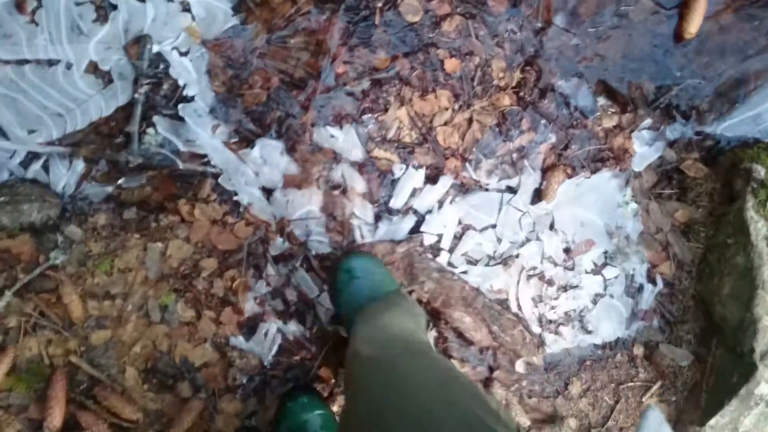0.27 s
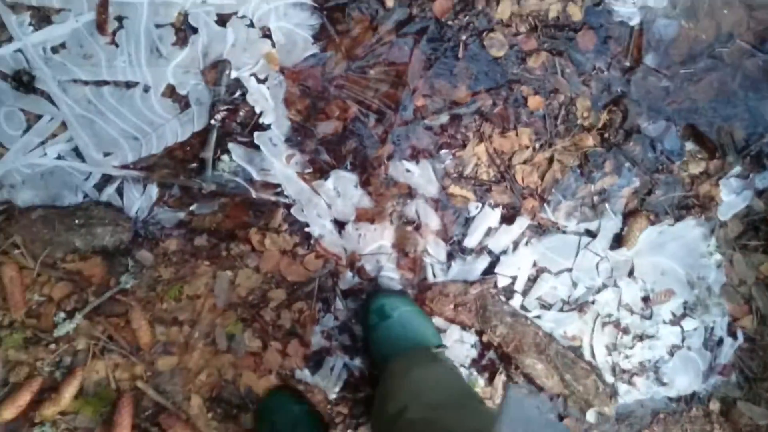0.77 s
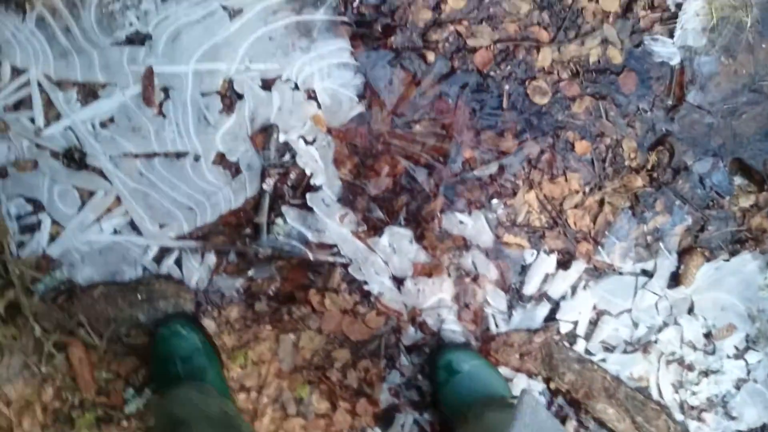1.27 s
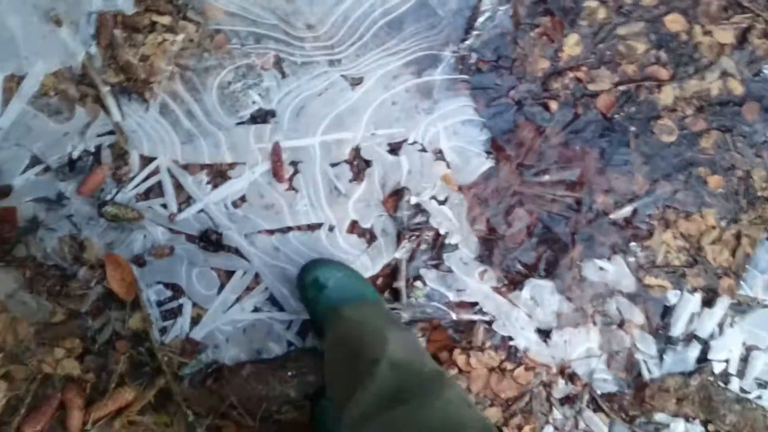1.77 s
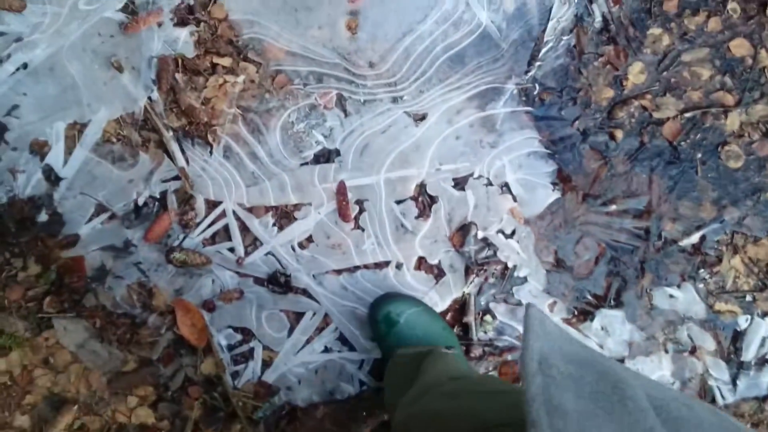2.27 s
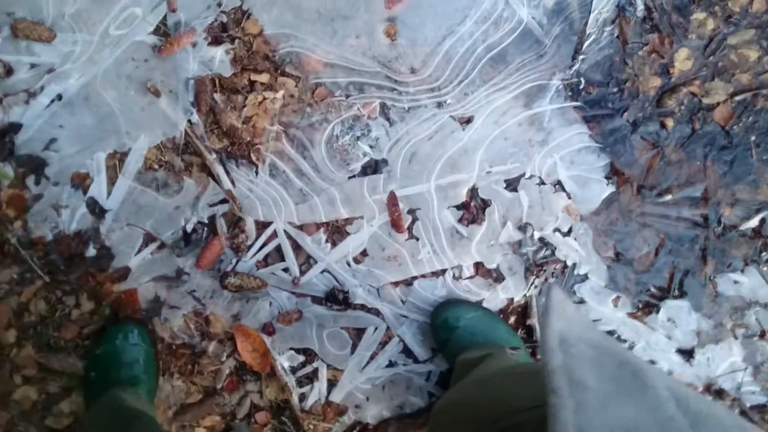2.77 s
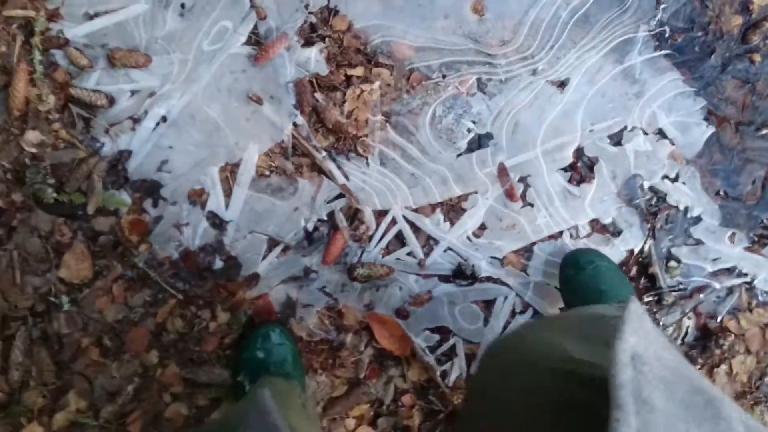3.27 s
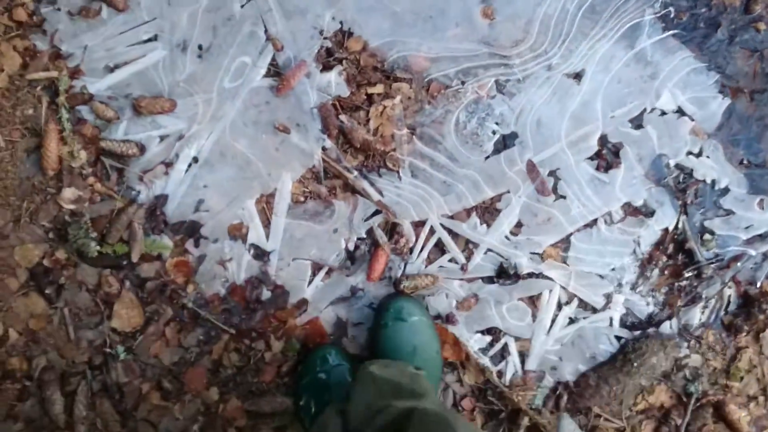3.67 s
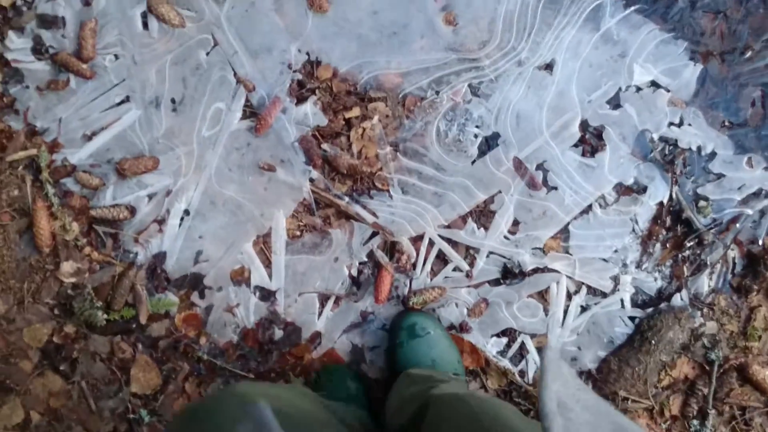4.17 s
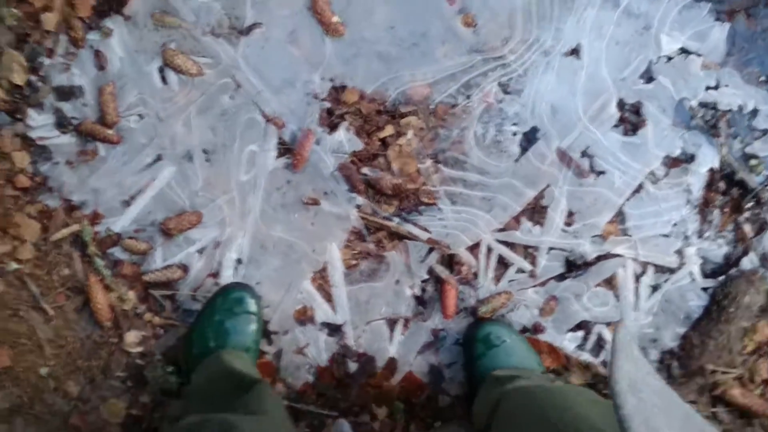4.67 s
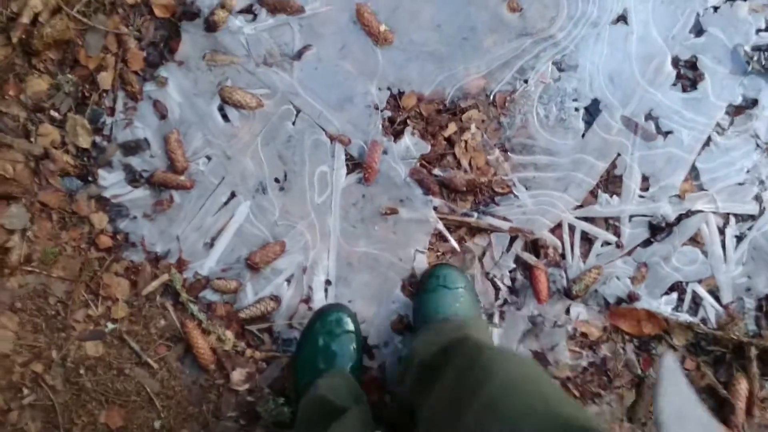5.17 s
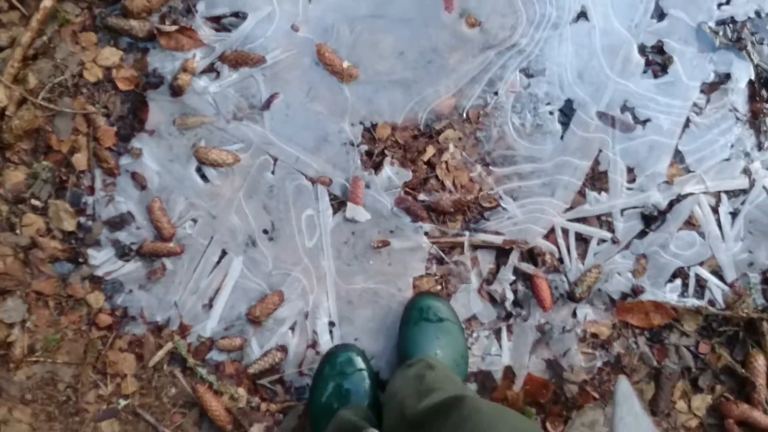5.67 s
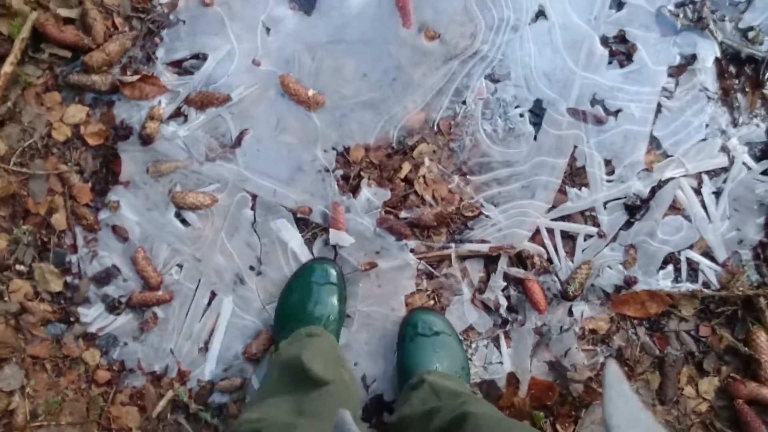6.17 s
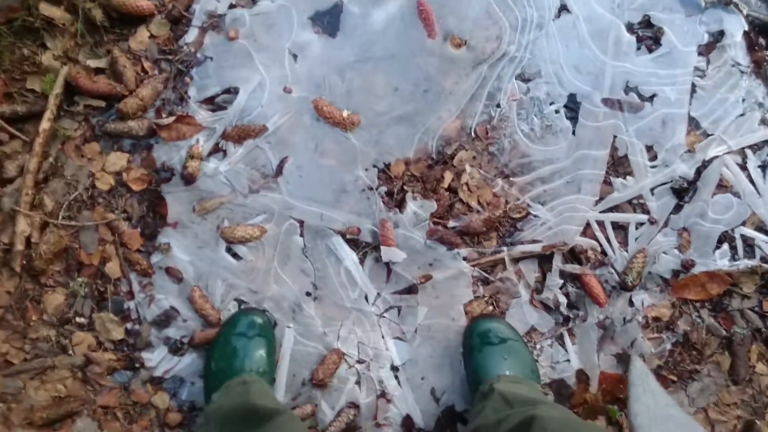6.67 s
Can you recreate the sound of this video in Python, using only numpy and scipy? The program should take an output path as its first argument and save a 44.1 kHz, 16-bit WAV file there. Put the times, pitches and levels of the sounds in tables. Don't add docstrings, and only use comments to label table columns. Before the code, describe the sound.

Rubber boots step on thin ice over a leafy forest puddle, cracking it sharply in irregular bursts with soft thuds and glassy tinkles.

```python
import sys
import numpy as np
from scipy import signal
from scipy.fft import rfft, irfft, next_fast_len
from scipy.io import wavfile
from scipy.ndimage import uniform_filter1d, minimum_filter1d, map_coordinates

SR = 44100
rng = np.random.default_rng(int(sys.argv[2]) if len(sys.argv) > 2 else 0)


def nominal_scale(level):
    x = np.asarray(level, float) / 20
    return 10 ** x


def wav_record(signal):
    frames = np.transpose(np.atleast_2d(signal))
    bounded = np.clip(frames, -1, 1)
    quanta = np.round(bounded * 32767).astype(np.int16)
    wavfile.write(sys.argv[1], SR, quanta)


N = 306054


def read(points, hz):
    f, value = np.transpose(points)
    return np.interp(np.log(hz + 1), np.log(f + 1), value)


def add(mix, s, sound):
    part = mix[:, max(round(s * SR), 0):][:, :sound.shape[1]]
    part += sound[:, :part.shape[1]]


# f/Hz, level/dB
LEAN = [(2000, -0.5), (4400, 1), (8000, -0.5), (15000, 3)]
# f/Hz, likeness/1
OPPOSED = [(100, 0.88), (500, 1), (1500, 0.87), (4000, 0.16), (12000, 0.63)]


def ports(a, b, hz, likeness, lag_s):
    same = np.clip(read(likeness, hz), 0, 1)
    lean = nominal_scale(read(LEAN, hz) / 2)
    felt = 1 / (1 + (900 / (hz + 1)) ** 4)
    shifted = a * np.exp(-2j * np.pi * hz * lag_s * felt)
    right = -same * shifted + np.sqrt(1 - same ** 2) * b
    return np.array([a * lean, right / lean])


# f/Hz, level/(dB per Hz)
AIR = [(15, -36.5), (25, -13), (85, 1), (238, -6), (320, -5.5), (432, -5), (806, -9), (1870, -8),
       (4460, -15), (6340, -14.5), (15100, -24), (16400, -37)]
# f/Hz, likeness/1
AIR_OPPOSED = [(60, 0.3), (400, 0.69), (1500, .2), (4000, .02)]


def air():
    level_db = -65.5
    hz = np.fft.rfftfreq(N, 1 / SR)
    noise = rfft(rng.standard_normal((2, N)))
    pair = irfft(ports(*noise, hz, AIR_OPPOSED, 0) * nominal_scale(read(AIR, hz)), N)
    return nominal_scale(level_db) * pair / pair.std()


# t/s, right port lag/ms
STANCE = [(0, 0.17), (.42, 0.28), (.52, 0.19), (2.05, 0.096), (2.15, 0.045), (2.4, 0.058), (2.85, 0.015),
          (3.36, 0.086), (3.65, 0.13), (3.76, 0.017), (4.4, 0.11), (5.1, 0.12), (5.42, 0.026), (5.6, 0.055),
          (6.4, 0.039), (6.85, 0.083)]


def stance_lag_s(t):
    return np.interp(t, *np.transpose(STANCE)) / 1000


# f/Hz, level/(dB per Hz)
ICE = [(120, -46.5), (280, -24), (550, -5), (1000, -3.5), (1700, 1), (2300, -4.5), (3500, -11), (4300, -16),
       (4800, -15), (5300, -9.5), (6400, -6), (7600, -11), (13500, -14.5), (14900, -6), (16200, -17.5)]
SPLIT_HZ = [4200, 9000]


def ice_bands(size):
    hz = np.fft.rfftfreq(size, 1 / SR)
    above = [1 / (1 + (f / (hz + 1)) ** 14) for f in SPLIT_HZ]
    shares = np.array([above[0] - above[1], 1 - above[0], above[1]])
    log_gain = np.log(nominal_scale(read(ICE, hz)) * np.sqrt(abs(shares)) + 1e-5)
    circle = np.concatenate([log_gain, log_gain[:, -2:0:-1]], axis=1)
    minimum_phase = np.exp(np.conj(signal.hilbert(circle, axis=1)))
    return hz, minimum_phase[:, :len(hz)]


def fractures(size, per_s, spread_db):
    strength = nominal_scale(spread_db * np.minimum(rng.exponential(1, size), 4))
    strength *= rng.random(size) < per_s / SR
    return strength * rng.standard_normal((2, size))


# peak t/s, level/dB, loading/s, easing/s, wetness/dB
PRESSES = [(.106, -53, 0.19, 0.43, -0.5), (.265, -54, 0.02, 0.39, 23), (0.356, -25.5, 0.047, 0.077, 1),
           (.607, -49.5, 0.37, 0.47, 5), (1.334, -63.5, .06, 0.18, -8.5), (1.51, -50, 0.013, 0.37, -6.5),
           (4.8, -62.5, .1, 0.12, -2.5), (1.581, -47.5, 0.092, 0.62, -11), (1.836, -50, 0.42, 0.1, -12.5),
           (2.048, -40, .012, 0.16, 14), (2.1, -36.5, 0.13, 0.46, -5.5), (2.442, -44, 0.13, 0.15, 1.5),
           (2.641, -29, 0.021, 0.17, 1), (2.8, -49.5, 1, 1, -0.5), (3.178, -51.5, 0.078, 0.052, 2.5),
           (3.389, -39.5, 0.13, 0.29, -4.5), (3.62, -69, 0.12, 0.6, 16.5), (3.784, -38.5, 0.11, 0.21, 2.5),
           (4.29, -49.5, 0.082, 0.83, -5.5), (5.169, -52.5, 0.2, 0.22, -1),
           (5.417, -30.5, 0.0091, 0.35, -6), (5.883, -41, 0.023, 0.094, 12), (6.039, -51, 0.33, 0.28, -5),
           (6.136, -34, 0.027, 0.046, 12), (6.303, -36.5, 0.014, 1, -1.5),
           (6.862, -39.5, 0.0084, 0.097, 13)]
LIFTS = [
    4.47,
    6.55,
]


def pressure_db(t):
    idle_db, swing_db, lift_db_per_s = -88.5, 30, 160
    dry_fizz_db, wet_dulls, fizz_drop = 4, 0.33, 2.2
    power = nominal_scale(2 * idle_db) * np.ones((3, len(t)))
    for s, db, loading_s, easing_s, wet_db in PRESSES:
        drop_db = swing_db * np.where(t < s, (s - t) / abs(loading_s), (t - s) / abs(easing_s))
        drop_db = drop_db + lift_db_per_s * sum(np.maximum(t - lift, 0) for lift in LIFTS if lift > s)
        fizz_db = dry_fizz_db - wet_dulls * wet_db - fizz_drop * drop_db
        power = power + nominal_scale(2 * (db + np.array([-drop_db, wet_db - drop_db, fizz_db])))
    return 10 * np.log10(power)


def crunch():
    size = next_fast_len(N // 2 + 2048, real=True) * 2
    hz, t, out = np.fft.rfftfreq(size, 1 / SR), np.arange(N) / SR, 0
    bands = rfft(irfft(ice_bands(size=4096)[1]), size)
    clumps = uniform_filter1d(rng.standard_normal(size), size=130)
    clumps /= clumps.std()
    for band, level_db, clump_db in zip(bands, pressure_db(t), [4.0, 2.2, 4.5]):
        swarm = fractures(size, per_s=4500, spread_db=3.5) * nominal_scale(clump_db * clumps)
        pair = irfft(ports(*rfft(swarm), hz, OPPOSED, 0) * band, size)[:, :N]
        loudness = np.sqrt(uniform_filter1d(pair.mean(0) ** 2, size=30000))
        out = out + pair / loudness * nominal_scale(level_db)
    trailing = (t - stance_lag_s(t)) * SR
    return np.array([out[0], map_coordinates(out[1], [trailing], order=3)])


def patchy(x, depth_db):
    z = signal.stft(x, nperseg=512)[2]
    patches = uniform_filter1d(rng.standard_normal(z.shape[1:]), size=2, axis=0)
    patches = uniform_filter1d(patches, size=5, axis=1)
    gain_db = depth_db * patches / patches.std() - 0.52 * depth_db ** 2
    return signal.istft(z * nominal_scale(gain_db), nperseg=512)[1][:, :N]


# t/s, sheet f/Hz, splinter f/Hz, bite level/dB, belly level/dB
PIECES = [(0.163, 1550, 7470, 3.5, 12.5), (0.2566, 1470, 6260, 12.5, 8), (0.267, 1990, 6600, 17.5, 1.5),
          (0.2741, 1890, 5370, 13, -6), (0.2966, 2240, 6150, 7.5, -7), (0.3107, 1194, 6300, 3.5, -15.5),
          (0.3248, 1780, 7300, 5, -7.5), (0.342, 1460, 6300, 3, -2.5), (0.3594, 1787, 6640, 1, -9),
          (0.613, 1330, 6000, 2, 18), (2.042, 1437, 6330, -2, -3.5), (2.09, 1697, 5300, -3, 1.5),
          (2.1, 1550, 5300, -16, 4), (2.145, 1345, 5700, -5, -1.5), (2.4227, 1032, 8490, -4, 15),
          (2.6024, 950, 5680, -5, 6.5), (2.6351, 1603, 5500, 5.5, 11.5), (2.65, 1170, 5660, -4, 2),
          (2.7732, 2400, 5340, -14, 1), (3.3653, 1640, 5800, -0.5, -3), (3.3982, 1420, 5440, -0.5, 3.5),
          (3.7606, 2050, 5800, -3.5, 6.5), (3.8057, 2000, 6050, -7, -3), (4.408, 2156, 4670, 3.5, -22),
          (5.155, 1640, 6140, -5.5, -22.5), (5.4126, 1394, 5140, 1.5, 2.5), (5.4302, 1570, 5530, 4, 8.5),
          (5.8755, 1600, 6600, 0.5, -17), (6.1211, 1533, 4530, -4.5, -2), (6.2956, 1200, 6660, 1, 0.5),
          (6.3472, 1380, 6100, -8, 1), (6.4032, 1482, 6040, -5, 2.5), (6.8594, 1410, 6520, -2.5, 5.5)]


def freed_pieces(s, hz):
    bite_hz, belly_hz = 3250, 950
    piece_hz = 1050 * 11 ** rng.random((9, 1))
    near_s, sheet_hz, splinter_hz, bite_db, belly_db = min(PIECES, key=lambda row: abs(row[0] - s))
    large = abs(near_s - s) < .005
    if large:
        piece_hz = np.concatenate([[[sheet_hz], [sheet_hz], [splinter_hz]], piece_hz[2:]])
    bite = np.exp(-(np.log((hz + 1) / bite_hz) / .25) ** 2)
    belly = 1 / (1 + (hz / belly_hz) ** 8)
    pole = np.pi * piece_hz / 19
    rings = (pole / (pole + 2j * np.pi * (hz - piece_hz))).sum(0)
    return (0.79 + rings * 1.1) * nominal_scale(large * (bite_db * bite + belly_db * belly))


def cracks(rows, fizz_db, size):
    lead = 300
    hz, bands = ice_bands(size)
    t, out = (np.arange(size) - lead) / SR, np.zeros((2, N))
    for s, db, sheet_db, t60 in rows:
        db = min(db, -3)
        swarm = fractures(size, per_s=20000, spread_db=1.5)
        pieces = freed_pieces(s, hz)
        lag_s = stance_lag_s(s) + .02e-3 * rng.standard_normal()
        build_up = np.exp(np.minimum(t, 0) / (0.0003 + 0.007 * t60))
        snap = 1 + 1.9 * np.exp(-abs(t) / 0.0016 - t60 / 0.17)
        sound = 0
        for band, level_db, stretch in zip(bands, [db, db + sheet_db, db + fizz_db], [1.1, 1.5, .85]):
            decay = nominal_scale(-60 * np.maximum(t, 0) / abs(t60 * stretch))
            shape = build_up * snap * decay * (t < .07)
            spectra = ports(*rfft(swarm * shape), hz, OPPOSED, lag_s)
            pair = irfft(spectra * band * pieces, size)
            peak = uniform_filter1d(pair.mean(0) ** 2, size=100).max() ** .5
            sound = sound + nominal_scale(level_db) * pair / peak
        add(out, s - .0013 - lead / SR, sound)
    return out


# peak t/s, splinter level/dB, sheet level re splinter/dB, t60/s
SLABS = [(.1497, -57, 3.5, 0.021), (0.2566, -7.5, -8.5, 0.02), (0.2966, -37, 17, 0.041),
         (0.3248, -13, -2, 0.016), (0.342, -28, 11, 0.03), (.538, -37, -0.5, 0.053),
         (0.613, -42.5, -0.5, 0.07), (.7024, -34.5, -23, 0.032), (.941, -59.5, -9, 0.2),
         (1.616, -37, -24.5, 0.012), (1.679, -49, -9, 0.069), (1.7004, -35, -28, 0.0029),
         (1.8293, -37.5, -24, 0.038), (2.0395, -21, -12, 0.071), (2.1, -19.5, 4.5, 0.012),
         (2.7303, -37.5, -28, 0.07), (2.862, -38.5, -25, 0.024), (2.89, -49, -20, 0.019),
         (2.9016, -39.5, -26, 0.019), (3.1399, -39.5, -36.5, 0.0044), (3.6925, -45.5, -13, 0.014),
         (3.735, -44.5, 6, 0.56), (3.8057, -20, -7.5, 0.019), (5.067, -38.5, -20, 0.0095),
         (6.4032, -27.5, -2, 0.062), (6.8594, -17, -1.5, 0.064), (6.8756, -22, -6.5, 0.032)]
PLATES = [(0.025, -53.5, -26.5, 0.0078), (.267, -11, -6.5, 0.076), (0.2736, 0.5, -3, 0.028),
          (0.3101, -29.5, 11.5, 0.16), (.435, -65, 30, 0.051), (1.256, -64.5, 4, 0.032),
          (1.781, -47, -6, 0.086), (1.84, -38, -13.5, 0.12), (1.914, -47, -8, 0.15),
          (2.144, -26.5, -3, 0.066), (2.278, -35, -6, 0.069), (2.604, -31.5, -4, 0.04),
          (2.7834, -49, 17, 0.07), (3.113, -45, -21, 0.025), (3.3986, -31, -8.5, 0.058),
          (3.4365, -34, -35, 0.08), (3.4644, -39, -13, 0.069), (3.4957, -37, -16.5, 0.089),
          (3.524, -37, -28, 0.032), (3.5852, -46, -19, .022), (4.407, -25, -17.5, 0.033),
          (4.5908, -48.5, -13, .011), (5.349, -49.5, -22, 0.019), (5.413, -20.5, -2.5, 0.099),
          (5.8757, -21, -2, 0.036), (6.3474, -19.5, -10, 0.081), (6.3546, -14, -14, 0.0055),
          (6.5392, -47.5, -1, 0.32)]
PANES = [(0.105, -52, 13.5, 0.029), (0.3592, -3, -2.5, 0.012), (1.596, -38.5, -18, 0.026),
         (1.7974, -44, -10, 0.061), (1.947, -42, -16, 0.095), (2.073, -33, -19, 0.084),
         (2.092, -17.5, -2, 0.04), (2.2552, -43.5, -14, 0.22), (2.773, -30.5, 2.5, 0.079),
         (2.8375, -34, 0.5, 0.059), (2.9638, -51.5, -4, 0.23), (3.3649, -25.5, 2.5, 0.035),
         (3.541, -32, -19, 0.065), (3.7835, -27, -29, 0.061), (3.821, -38, -4.5, 0.038),
         (5.154, -41, 1, 0.061), (5.2262, -45, 0, 0.034), (5.5924, -43.5, 7.5, 0.049),
         (5.614, -42.5, -28, 0.25), (5.667, -42.5, -20, 0.074), (5.8648, -41, 3.5, 0.088),
         (6.1353, -26, 2, 0.045), (6.365, -22, -4.5, 0.02)]
NEEDLES = [(0.3764, -33.5, 4, 0.031), (0.5836, -37, -29, 0.034), (0.623, -40, -13, 0.041),
           (1.507, -48, -17, 0.081), (2.0435, -8, 1.5, 0.02), (2.0917, -19, 2, 0.079),
           (2.3238, -44.5, -12, 0.1), (2.586, -48, -3, 0.089), (2.6356, -10, -3.5, 0.057),
           (2.762, -41, -6, 0.047), (3.348, -42, -35, 0.15), (3.415, -33.5, -28, 0.024),
           (3.761, -27, -1, 0.055), (4.24, -51.5, -6.5, 0.073), (4.361, -54.5, -6, 0.41),
           (4.431, -45, 0.5, 0.1), (5.113, -37.5, -25, 0.027), (5.4305, -23.5, -8, 0.03),
           (5.4773, -27, -12, 0.028), (5.5132, -32, -18, 0.092), (5.6273, -40, -7, 0.051),
           (5.9958, -36.5, -7, 0.041), (6.0475, -47.5, 16.5, 0.1), (6.076, -31.5, -11, 0.053),
           (6.2962, 0.5, -3.5, 0.025), (6.484, -34.5, -0.5, 0.029), (6.9265, -38, -2.5, 0.036)]
SKIN = [(0.1, -44.5, -7, 0.021), (0.163, -51.5, 12, 0.013), (1.312, -61, 10.5, 0.021),
        (1.5222, -58, -5.5, 0.029), (2.174, -43, 0, 0.032), (2.187, -37.5, -23, 0.044),
        (2.297, -39.5, -26, 0.033), (2.423, -30, -12.5, 0.048), (2.449, -40, 4, 0.01),
        (2.652, -24.5, 3.5, 0.1), (3.1613, -43.5, -41, 0.034), (4.275, -45, -5, 0.016),
        (5.4687, -31, -10.5, 0.056), (5.699, -46.5, -5.5, 0.039), (5.9777, -42.5, -14, 0.029),
        (6.11, -39.5, -6.5, 0.046), (6.121, -25.5, 4.5, 0.073), (6.396, -33, -14, 0.057),
        (6.4105, -28.5, -6.5, 0.036), (6.4716, -30, -10.5, 0.034), (6.8644, -29.5, -20.5, 0.12)]
FIZZ_DB = [-15.5, -8.5, -5, 0.5, 5]


def breaking_ice():
    kinds = zip([SLABS, PLATES, PANES, NEEDLES, SKIN], FIZZ_DB)
    return sum(cracks(rows, fizz_db, size=3456) for rows, fizz_db in kinds)


def trees(x):
    t = np.arange(SR // 2) / SR
    taps = rng.standard_normal((2, len(t))) * (rng.random((2, len(t))) < .05)
    taps *= nominal_scale(-60 * t / 0.52) * (t > .006)
    return signal.fftconvolve(x, taps / np.linalg.norm(taps[0]), axes=1)[:, :N]


# t/s, splinter level/dB, sheet level re splinter/dB, t60/s
TICKS = [(.0476, -51.5, -9, 0.1), (.2875, -37, 9, 0.019), (.3331, -28, -5.5, .019), (.415, -47, 14, 0.033),
         (.443, -45.5, -2, 0.036), (.5186, -65, -0.5, 0.033), (.5544, -43.5, 4, 0.028),
         (.6665, -55, -5.5, .025), (.7445, -56, -14, 0.039), (2.0885, -20.5, -5.5, 0.096),
         (2.2255, -49, -19, 0.031), (2.549, -52, -11, 0.023), (2.9274, -49, -8, .025),
         (2.9827, -48, -18, .025), (3.171, -58, -22, .02), (3.309, -61.5, -17, 0.017),
         (4.2705, -51, 1, 0.014), (4.293, -53, 3.5, 0.028), (4.3114, -53, -9, 0.017),
         (5.5, -51.5, -13.5, 0.013), (5.548, -42, -16, 0.03), (5.819, -61.5, -7, 0.026),
         (5.931, -53, -3, 0.022), (6.025, -49, -12.5, .016), (6.0648, -36, -2, 0.028),
         (6.1434, -33, -1, 0.025), (6.1528, -37, -1, .023), (6.3068, -21, -4, 0.048),
         (6.3795, -46, -3.5, .016), (6.417, -31.5, 1, 0.031), (6.4565, -55, -17, 0.016),
         (6.5221, -47, -13.5, 0.017), (6.5895, -51, -13.5, 0.029)]


def ticks():
    return cracks(TICKS, -2.5, size=2048)


# t/s, knock level/dB
THUDS = [(0.27, -41), (.351, -34), (0.589, -47), (1.245, -46.5), (1.529, -42.5), (1.79, -48), (2.078, -31),
         (2.422, -40.5), (2.637, -32), (2.829, -41), (2.968, -39.5), (3.362, -42), (3.79, -52),
         (3.979, -41.5), (4.77, -54.5), (5.41, -40), (5.867, -67), (6.123, -60), (6.292, -34.5),
         (6.348, -43), (6.856, -37)]


def thuds():
    out, t = np.zeros((2, N)), np.arange(16000) / SR
    for s, knock_db in THUDS:
        ground_db = -32.5 + 0.94 * knock_db
        layers = [(ground_db, [50, 140], .22, .015), (knock_db, [140, 300], .11, .004)]
        for db, band_hz, t60, rise_s in layers:
            low = signal.butter(3, band_hz, "band", fs=SR, output="sos")
            shape = nominal_scale(-60 * t / t60) * (1 - np.exp(-t / rise_s))
            a, b = signal.sosfilt(low, rng.standard_normal((2, len(t))) * shape)
            pair = np.array([a + 0.1 * b, -a + 0.16 * b])
            add(out, s, nominal_scale(db - 1.0) * pair / abs(a).max())
    return out


# t/s, level/dB
JOLTS = [
    (0.274, -54),
    (0.356, -56),
    (2.635, -46),
    (2.876, -58),
    (3.94, -65.5),
]


def jolts():
    out, t = np.zeros((2, N)), np.arange(3000) / SR
    push = np.sin(2 * np.pi * 62 * t) * (t / 0.0042) * np.exp(1 - t / 0.0093)
    for s, db in JOLTS:
        add(out, s - .004, nominal_scale(db) * np.array([3.3 * push, -3.1 * push]))
    return out


# t/s, peak level/dB
SPECKS = [(.6844, -40), (1.5444, -47), (1.5605, -35), (1.6064, -35), (1.6424, -45), (1.667, -31),
          (1.7134, -41), (1.812, -33), (2.397, -36), (2.489, -33), (2.5017, -37), (3.088, -49),
          (3.1514, -33), (3.335, -34), (3.6698, -40), (3.774, -15), (3.853, -34), (3.899, -38),
          (3.9134, -41), (3.928, -39), (3.944, -37.5), (3.965, -49.5), (4.0676, -55), (4.1092, -46.5),
          (4.1654, -49.5), (5.748, -41), (5.7663, -44), (6.6467, -51), (6.654, -45), (6.6713, -43.5),
          (6.693, -49.5)]


def specks():
    level_db, sheet_db, t60 = -17, -20, 0.043
    rows = [(s + 0.0009, db + level_db, sheet_db, t60) for s, db in SPECKS]
    return cracks(rows, -1.5, size=1024)


# t/s, f/Hz, level/dB, t60/s
SHARDS = [(1.311, 1830, -41, 0.028), (2.188, 10530, -23, 0.022), (2.289, 906, -51.5, 0.24),
          (2.789, 1048, -32.5, 0.2), (3.234, 1137, -57, 0.39), (3.518, 1445, -51, 0.44),
          (3.52, 1714, -50.5, 0.27), (3.52, 2374, -42, 0.2), (3.634, 2154, -47, 0.25),
          (5.349, 1700, -59, 0.053), (5.589, 14800, -10.5, 0.0095), (5.589, 11140, -23.5, 0.025),
          (5.59, 4740, -23.5, 0.035), (5.626, 14800, -25, 0.031), (5.627, 11100, -28.5, 0.027),
          (5.697, 14850, -34, 0.019), (6.86, 493, -56, 0.39), (2.277, 1770, -37, 0.058),
          (6.362, 2007, -15, 0.057), (3.362, 1294, -21.5, 0.02), (3.365, 1710, -20.5, 0.028),
          (4.407, 4730, -8.5, 0.0079), (5.111, 2130, -25, 0.018), (2.225, 2090, -48, 0.27),
          (2.225, 1425, -51, 0.34), (2.255, 2080, -36.5, 0.12), (2.33, 1680, -47, 0.072),
          (2.15, 1392, -35.5, .1), (2.165, 2110, -33.5, 0.065), (2.17, 2410, -38, 0.07),
          (2.66, 898, -39, 0.33), (2.8, 1700, -32, 0.12), (3.46, 2940, -51.5, 0.23), (3.5, 1202, -54, 0.26),
          (3.52, 4750, -35.5, 0.056), (3.162, 9640, -41, 0.032), (2.298, 12600, -30, 0.024)]


def shards():
    rattle_db = 3
    out, t = np.zeros((2, N)), np.arange(12000) / SR
    for s, hz, db, t60 in SHARDS:
        rattle = uniform_filter1d(rng.standard_normal((2, len(t))), size=260)
        rattle /= rattle.std()
        phase = 2 * np.pi * hz * t + 0.45 * rattle[0] + np.array([[0], [2.2]])
        level = nominal_scale(db + rattle_db * rattle[1] - 60 * t / t60) * (1 - np.exp(-t / 0.001))
        add(out, s, level * np.sin(phase) * 2)
    return signal.sosfilt(signal.butter(4, 380, "high", fs=SR, output="sos"), out)


# t/s, gain/1
GLASSY = [
    (2.6, 0.28),
    (2.7, 2.3),
    (3.2, 2),
    (3.4, 0.74),
]


def glassy(x):
    b, a = signal.iirpeak(5650, 9, fs=SR)
    gain = np.interp(np.arange(N) / SR, *np.transpose(GLASSY))
    return np.array([x[0] + gain * signal.lfilter(b, a, x[0]), x[1]])


# t/s, left over right level/dB
SWAY = [(0.0, -2), (0.75, -1), (0.93, 6.5), (1.29, -8.5), (1.68, 8), (1.891, 1), (2.05, 3), (2.24, -3),
        (3.05, 3.5), (3.111, 5), (3.19, -0.5), (5.22, 0), (5.321, -1), (5.62, 0), (5.97, 0.5), (6.94, 1.5)]


def sway(x):
    left = nominal_scale(0.39 * np.interp(np.arange(N) / SR, *np.transpose(SWAY)) / 2)
    return x * np.array([left, 1 / left])


def scene():
    ice = breaking_ice()
    bed = patchy(crunch(), depth_db=4.5)
    underfoot = sway(glassy(bed + ice + ticks() + specks()))
    echo = nominal_scale(-30) * trees(ice)
    return air() + underfoot + echo + thuds() + jolts() + shards()


def top_cut(x):
    return signal.sosfilt(signal.butter(12, 16540, fs=SR, output="sos"), x)


def record(dry):
    edge_hz = 16030
    headroom = 1 / np.maximum(abs(dry).max(0), 1)
    limited = dry * uniform_filter1d(minimum_filter1d(headroom, size=129), size=64)
    lowpass = signal.firwin(511, edge_hz, window=("kaiser", 8), fs=SR)
    banded = signal.oaconvolve(limited, lowpass[None], "same")
    return top_cut(banded)


dry = scene()
out = record(dry)
wav_record(out)
```